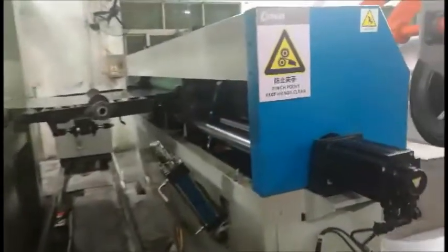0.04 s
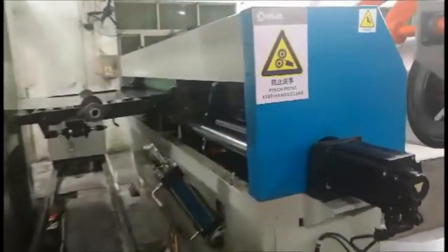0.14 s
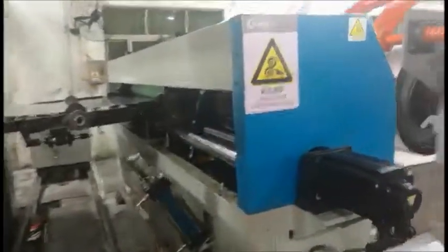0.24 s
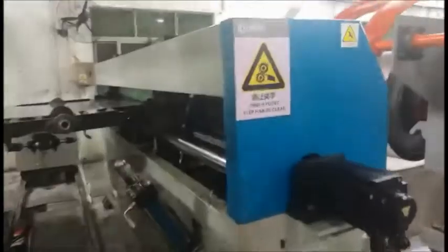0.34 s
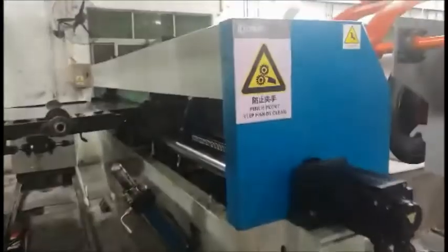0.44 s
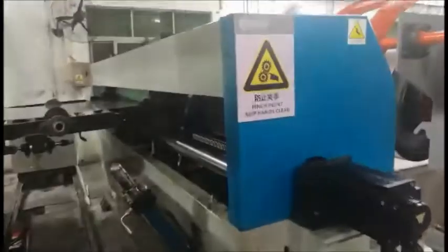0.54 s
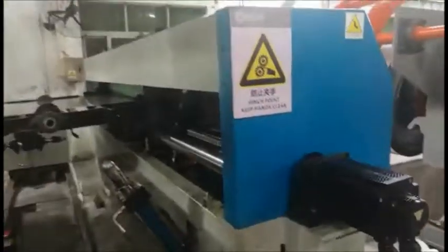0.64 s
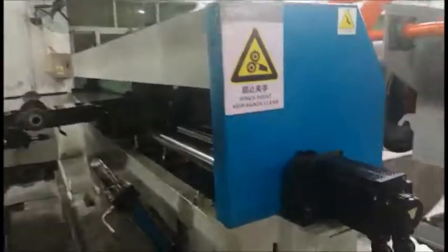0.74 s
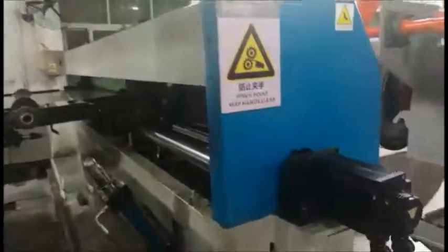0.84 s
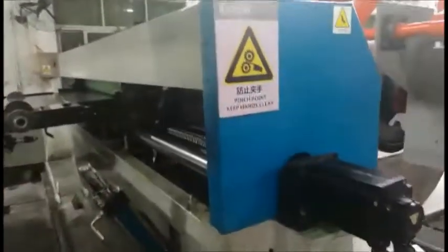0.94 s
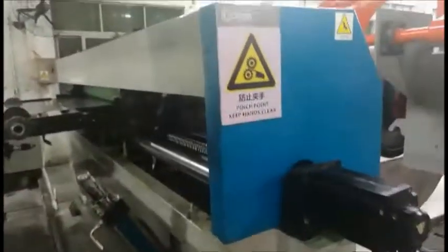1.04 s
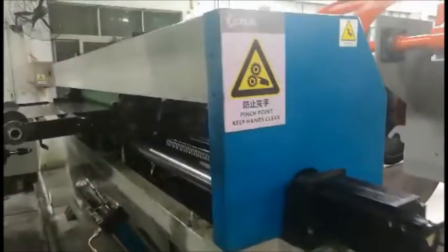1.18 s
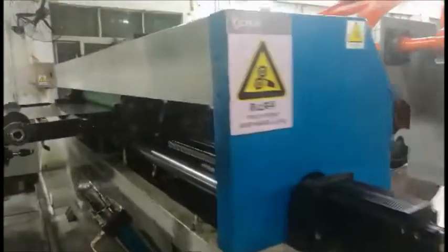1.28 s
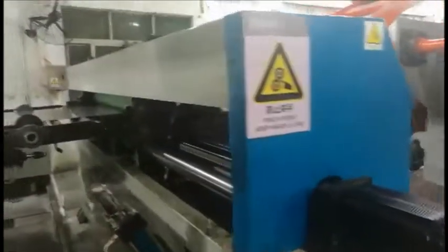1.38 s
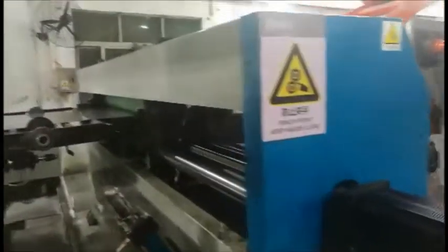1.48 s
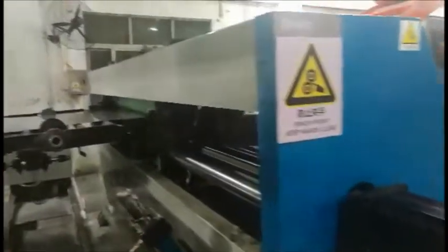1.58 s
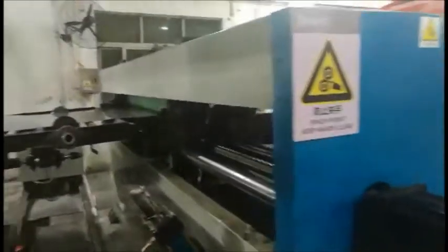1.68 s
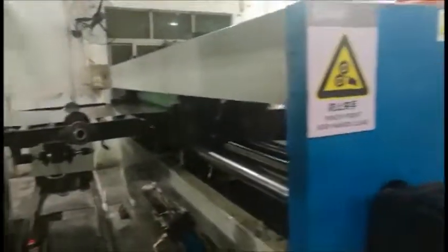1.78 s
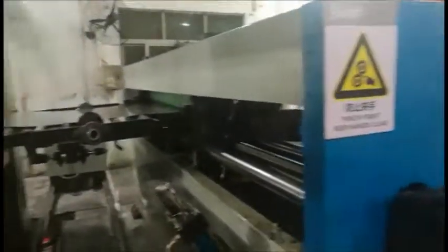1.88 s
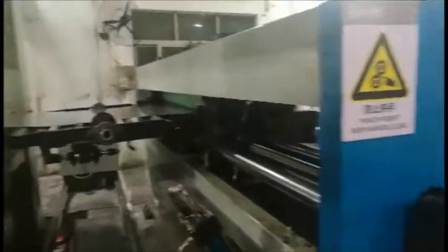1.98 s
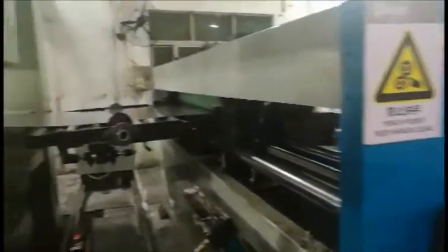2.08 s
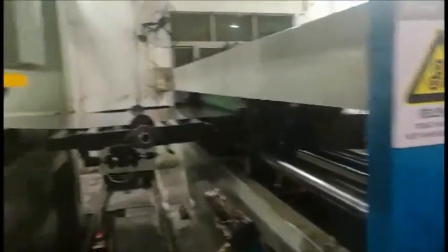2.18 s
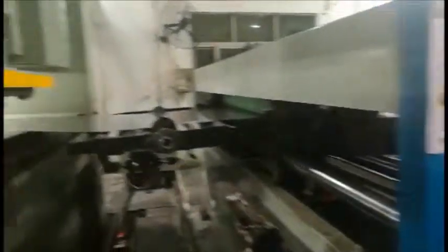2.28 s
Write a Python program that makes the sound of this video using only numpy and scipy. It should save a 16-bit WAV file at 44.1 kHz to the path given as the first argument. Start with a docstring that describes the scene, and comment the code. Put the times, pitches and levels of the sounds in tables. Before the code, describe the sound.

A power press slams sheet metal twice, each bang booming and ringing into a large hall; between them air hisses, feed rolls clunk softly and small parts click. Close stereo microphones, steady distant machine noise.

```python
"""Large factory hall, two microphones close to a power press stamping sheet metal: two strokes 1.45 s apart,
over the dying echo of an earlier one. Each is a quick run of coloured noise bursts for the die, with sines
for the booming, ringing frame, a bright sizzle and a long hall echo of decaying noise.
The strip feeder adds puffs, clunks, clicks and sliding hiss, all shaped noise; farther off, steady
shop noise and a faint sine hum. The recorder's gain control ducks after the bangs."""
import sys
import numpy as np
from scipy import signal
from scipy.fft import rfft, irfft
from scipy.io import wavfile

SR = 44100
rng = np.random.default_rng(int(sys.argv[2]) if len(sys.argv) > 2 else 0)


def generate_wav(signal):
    """Clip the signal to [-1, 1] and save it as 16-bit WAV at the path in sys.argv[1]."""
    frames = np.transpose(np.atleast_2d(signal))
    scaled = np.clip(frames, -1, 1) * 32767
    pcm = np.round(scaled).astype(np.int16)
    wavfile.write(sys.argv[1], SR, pcm)


N = 101430

# press strokes, the first before the start: t/s, level/dB, treble/dB, hall level/dB, sizzle rise/s, bass/dB
STROKES = [(-1, -1.5, 0, -3.5, .01, -1), (.237, 0, 3, 1.37, 0.0078, -0.5), (1.688, 0.5, 0, 0, 0.011, -2)]
# blows in a stroke (stripper lands, punch meets sheet, bites, snaps through, ram bottoms):
# t from the stroke/s, level/dB, rise/s, bass/dB, treble/dB
BLOWS = [(-.012, -11.5, .008, 10.5, 7), (-.001, 0.5, .002, 1, -2), (.003, -0.5, .002, -10, 2),
         (0.024, -.5, .003, 0.5, -3), (.035, -1, 0.0039, -1, -3)]
# left-right likeness of the hall sound: f/Hz, correlation (-1 to 1)
HALL_LIKENESS = [(60, 1), (200, 1), (380, 0.48), (690, -0.44), (1300, 0.21), (2400, -0.19), (5000, 0.0074)]
# left-right balance of the hall sound: f/Hz, left over right/dB
HALL_BALANCE = [(200, 0), (600, -1), (1000, 0), (2000, 3), (4000, 0), (8000, 0), (13000, -2.5)]


def amp(db):
    """Decibels to gain."""
    return 10 ** (np.asarray(db) / 20)


def read(points, hz):
    """Reads a table along log frequency."""
    f, value = np.transpose(points)
    return np.interp(np.log(hz + 1), np.log(f), value)  # + 1 keeps 0 Hz finite


def pan(db):
    """Left and right gains for a level difference, left over right."""
    left_db = np.atleast_1d(db) / 2
    return amp(np.array([left_db, -left_db]))


def add(mix, s, sound):
    """Mixes a sound in at a time, which may be negative."""
    at = round(s * SR)
    sound, part = sound[:, max(-at, 0):], mix[:, max(at, 0):]
    n = min(sound.shape[1], part.shape[1])
    part[:, :n] += sound[:, :n]


def envelope(rise_s, t60_s):
    """A straight rise, then an exponential decay by 60 dB per t60."""
    t = np.arange(N) / SR
    rise = np.minimum(t / rise_s, 1)
    return rise * amp(-60 * np.maximum(t - rise_s, 0) / t60_s)


def noise(spectrum, likeness=None, balance=None):
    """Stereo noise of unit RMS with a colour, a left-right likeness and a balance."""
    hz = np.fft.rfftfreq(N, 1 / SR)
    a, b = np.exp(2j * np.pi * rng.random((2, len(hz))))
    c = np.clip(read(likeness, hz), -1, 1) if likeness else 0
    mid, side = a * np.sqrt(1 + c), b * np.sqrt(1 - c)
    side_gains = pan(read(balance, hz) if balance else 0)
    x = irfft(np.array([mid + side, mid - side]) * amp(read(spectrum, hz)) * side_gains, N)
    return x / np.sqrt(np.mean(x ** 2))


def dying(x, t60s, size=512):
    """Lets every frequency die away at its own speed."""
    hz, t, z = signal.stft(x, SR, nperseg=size)
    decay = amp(-60 * t / read(t60s, hz)[:, None])
    return signal.istft(z * decay, SR, nperseg=size)[1][:, :N]


def toned(x, bass_db, treble_db):
    """Lifts or lowers bass and treble around the middle."""
    bass_hz, middle_hz, treble_hz = 200, 1100, 3480
    hz = np.fft.rfftfreq(2 * N, 1 / SR)
    db = read([(bass_hz, bass_db), (middle_hz, 0), (treble_hz, treble_db)], hz)
    return irfft(rfft(x, 2 * N) * amp(db))[:, :N]


def press():
    """Every stroke repeats the same crash and ring, with its own tone, sizzle and hall echo."""
    out, die = np.zeros((2, N)), crash()
    lead_in_s = -BLOWS[0][0]  # the first blow lands this long before the stroke time
    add(die, lead_in_s, frame())
    for s, db, treble_db, hall_db, sizzle_rise_s, bass_db in STROKES:
        add(out, s - lead_in_s, amp(db) * toned(die, bass_db, treble_db))
        add(out, s, amp(db) * sizzle(sizzle_rise_s))
        add(out, s, amp(hall_db) * hall_echo())
    return out


def crash():
    """The blows of one stroke, each setting off dense, short ringing in die and sheet."""
    # colour of the die: f/Hz, level per Hz/dB
    crash_colour = [(25, -38), (50, -17), (100, 11), (170, 4), (250, -6), (330, 12), (450, -9), (650, -2),
                    (1000, 6), (1500, -1.5), (2200, -3.5), (3200, -9.5), (5500, -12), (7000, -40),
                    (15000, -14)]
    # ringing time: f/Hz, t60/s
    crash_t60 = [(60, 0.13), (300, 0.49), (900, 0.4), (2000, 0.32), (5000, 0.13), (12000, .4)]
    # stereo likeness: f/Hz, correlation (-1 to 1)
    crash_likeness = [(60, .99), (150, 0.39), (300, 0.55), (600, -0.1), (1000, -0.67), (1500, 0.26),
                      (14000, 0.14)]
    # stereo balance: f/Hz, left over right/dB
    crash_balance = [(150, -1), (330, -3), (600, -8), (950, 4.5), (1500, 1), (4500, 0.5), (8000, 11.5)]
    crash_db = -15
    out = np.zeros((2, N))
    for s, db, rise_s, bass_db, treble_db in BLOWS:
        struck = toned(noise(crash_colour, crash_likeness, crash_balance), bass_db, treble_db)
        ringing = dying(struck, crash_t60)
        add(out, s - BLOWS[0][0], amp(db) * ringing * envelope(rise_s, np.inf))
    return amp(crash_db) * out


def frame():
    """The frame's modes swell as the load builds and ring on; the low boom comes late, close pairs beat."""
    # modes of frame and die: f/Hz, level/dB, t60/s, left over right/dB, left phase lead/rad,
    # beat rate of a close pair/Hz (applied only above 1)
    modes = [(54.3, -23, 0.41, 0, -0.15, 0.19), (93, -43, 2.1, -7, 1, 0.5),
             (130.5, -18.5, 0.29, -5, -0.2, 0), (154.9, -22, 2.65, 1, 0.006, 4.5),
             (174.6, -13.5, 0.17, 4, 0.28, -0.5), (181.9, -21.5, 1.68, -2, -0.4, 0.5),
             (252, -23.5, 1.96, 2, 0.59, 0), (316.3, -21, 1.84, -2.5, -0.16, -1),
             (369.5, -25, 1.9, 12, 0.99, -1), (393, -30, 1.4, -5, 1, 1.5),
             (495, -21.5, 0.87, -1.5, -2.7, -1), (562, -34.5, 1.8, 2, -0.36, 2),
             (726, -24, .5, -10, -2, -1), (818, -22, 0.32, 1, -0.88, -0.5),
             (973, -25.5, 0.66, -11, -0.35, 0.5), (1319, -31, 0.93, 4, -1.9, -0.5),
             (1377, -33, 0.79, 6, 1, -0.5), (1582, -32.5, .5, 8, 0.87, -1.5)]
    mode_rise_s = 0.024
    boom_below_hz, boom_rise_s, boom_delay_s = 110, 0.022, 0.016
    t, out = np.arange(N) / SR, np.zeros((2, N))
    for hz, db, t60, side_db, lead, beat in modes:
        delay_s, rise_s = (boom_delay_s, boom_rise_s) if hz < boom_below_hz else (0, mode_rise_s)
        phase = 2 * np.pi * (hz * t + rng.random()) + np.array([[lead], [0]])
        throb = np.sin(np.pi * beat * t) if beat > 1 else 1
        add(out, delay_s, amp(db) * pan(side_db) * envelope(rise_s, t60) * throb * np.sin(phase))
    return out


def sizzle(rise_s):
    """Bright noise that rises with the stroke and decays."""
    # f/Hz, level per Hz/dB
    sizzle_colour = [(1500, 15), (4000, 7.5), (5600, 1.5), (6800, -1), (8500, 3.5), (10000, 1), (12000, 2),
                     (14500, -14.5)]
    sizzle_db, t60_s = -19.5, 0.65
    return amp(sizzle_db) * noise(sizzle_colour, balance=HALL_BALANCE) * envelope(rise_s, t60_s)


def hall_echo():
    """The hall answers with diffuse noise, each frequency dying at its own speed."""
    # colour of the echo: f/Hz, level per Hz/dB
    hall_colour = [(25, -28), (50, -3.5), (115, -6), (170, -1.5), (220, 1), (330, 1.5), (450, -4.5),
                   (850, -3.5), (1500, -11), (2300, -13), (3300, -17.5), (5500, -18.5), (7000, -26.5),
                   (14000, -29.5)]
    # echo time: f/Hz, t60/s
    hall_t60 = [(55, 1.4), (200, 2.63), (800, 2.81), (2000, 2.36), (5000, 1.88), (12000, 2.35)]
    echo_db, rise_s = -19, 0.042
    echo = dying(noise(hall_colour, HALL_LIKENESS, HALL_BALANCE), hall_t60)
    return amp(echo_db) * echo * envelope(rise_s, np.inf)


def feeder():
    """The strip feeder beside the press: sliding strip, air, feed rolls and small parts."""
    return strip_slide() + air_puffs() + roll_clunks() + part_clicks()


def strip_slide():
    """Hiss of the sliding strip, swelling up to each stroke time and fading after it."""
    # f/Hz, level per Hz/dB
    slide_colour = [(500, -24), (2000, -2), (5000, 2), (7500, -4.5), (13000, -1.5)]
    slide_db, slide_s = -38.5, 0.083  # time for a fall by a factor e either side
    out, t = np.zeros((2, N)), np.arange(N) / SR
    for s, *_ in STROKES:
        out += amp(slide_db) * noise(slide_colour) * np.exp(-abs(t - s) / slide_s)
    return out


def air_puffs():
    """Short puffs of air: hissing noise with a quick rise and a decay."""
    # t/s, level/dB, rise/s, t60/s, left over right/dB
    puffs = [(.412, -25, .014, 0.31, 2), (.646, -23.5, 0.0048, 0.31, 1), (.805, -39, 0.024, 0.53, 2),
             (1.556, -32, .012, 0.41, 0), (1.845, -29, 0.034, 0.47, 0.5), (2.28, -31.5, 0.015, 0.43, 3)]
    # f/Hz, level per Hz/dB
    puff_colour = [(800, -30), (2000, -2), (3500, 1.5), (5600, 4), (7000, -2.5), (8700, 0.5), (11000, 2),
                   (13500, 2), (15000, 3.5)]
    out = np.zeros((2, N))
    for s, db, rise_s, t60, side_db in puffs:
        hiss = noise(puff_colour, balance=HALL_BALANCE)
        add(out, s, amp(db) * pan(side_db) * hiss * envelope(rise_s, t60))
    return out


def roll_clunks():
    """Dull clunks of the feed rolls, noise with a long hall-like tail."""
    # t/s, level/dB
    clunks = [(.62, -31), (.79, -34.5)]
    # f/Hz, level per Hz/dB
    clunk_colour = [(60, -29), (150, 1), (330, -0.5), (700, -1), (1500, -5), (2400, -9.5), (4000, -17),
                    (8000, -26.5)]
    rise_s, t60_s = 0.013, 1.8
    out = np.zeros((2, N))
    for s, db in clunks:
        clunk = noise(clunk_colour, HALL_LIKENESS, HALL_BALANCE)
        add(out, s, amp(db) * clunk * envelope(rise_s, t60_s))
    return out


def part_clicks():
    """Clicks of feed parts and strip: a band of noise with a sharp rise and its own decay."""
    # t/s, level/dB, centre f/Hz, t60/s, left over right/dB
    clicks = [(.02, -48.5, 4300, .12, -3), (.06, -48, 4000, .1, 0), (0.175, -35.5, 2680, 0.034, 8.5),
              (0.645, -41, 5600, 0.12, 5), (0.652, -38.5, 1890, 0.79, 6), (0.829, -39, 3320, .18, 3),
              (1.11, -40, 1500, 0.31, 4), (1.632, -41, 3800, 0.098, 1), (2.047, -38, 13000, .04, 3),
              (2.272, -36.5, 2570, 0.4, -3)]
    step_octaves, rise_s = 0.54, 0.0018
    out = np.zeros((2, N))
    for s, db, hz, t60, side_db in clicks:
        # bell-shaped band: 5 dB down one step from the centre, 20 dB at two
        band = [(hz * 2 ** (k * step_octaves), -5 * k * k) for k in range(-4, 5)]
        add(out, s, amp(db) * pan(side_db) * noise(band) * envelope(rise_s, t60))
    return out


def shop():
    """Distant machines as steady noise, and a faint motor hum of sines."""
    # machine noise: f/Hz, level per Hz/dB
    shop_colour = [(25, -10), (50, -10.5), (85, 0.5), (120, -1.5), (160, -9.5), (300, 4), (480, -5),
                   (800, -1.5), (1300, -6.5), (2200, -8), (4000, -12), (7000, -19), (10000, -19.5),
                   (14000, -19.5)]
    # motor hum: f/Hz, level/dB
    hum_tones = [(84, -65.5), (265, -48), (775, -54.5)]
    shop_db = -39
    t = np.arange(N) / SR
    hum = sum(amp(db) * np.sin(2 * np.pi * (hz * t + rng.random())) for hz, db in hum_tones)
    return amp(shop_db) * noise(shop_colour, HALL_LIKENESS, HALL_BALANCE) + hum


def panel_ripple(x):
    """Many narrow resonances among the steel panels, a different set for each side."""
    rms_db, width_hz, full_above_hz = 2.5, 65, 1260
    hz, grid = np.fft.rfftfreq(N, 1 / SR), np.arange(1000)
    heights_db = rng.uniform(-1, 1, (2, len(grid))) * np.sqrt(3) * rms_db
    db = np.array([np.interp(hz / width_hz, grid, row) for row in heights_db])
    gain = amp(db * np.minimum(hz / full_above_hz, 1) ** 2)
    # minimum phase, so the panels ring only after the sound
    log_gain = np.log(np.concatenate([gain, gain[:, -2:0:-1]], axis=1))
    causal = np.exp(np.conj(signal.hilbert(log_gain)))[:, :len(hz)]
    return signal.fftconvolve(x, irfft(causal)[:, :4096], axes=1)[:, :N]


def scene():
    """Press, feeder and shop among the steel panels; two close microphones hear the bass alike."""
    left, right = panel_ripple(press() + feeder() + shop())
    full_width_hz = 170  # the side signal narrows below this
    hz = np.fft.rfftfreq(N, 1 / SR)
    mid = (left + right) / 2
    side = irfft(rfft(left - right) / 2 * np.minimum(hz / full_width_hz, 1), N)
    return np.array([mid + side, mid - side])


def record(dry):
    """Gain control ducks after each bang and recovers; soft overload on the peaks, then the band limit."""
    knee_db, squeeze, sense_s = -22.5, 0.25, 0.046  # squeeze: dB of ducking per dB over the knee
    sensed_fall_db_per_s, edge_hz = 16, 14150
    r = np.exp(-1 / (sense_s * SR))
    power = signal.lfilter([1 - r], [1, -r], (dry ** 2).mean(0))
    power_db = 10 * np.log10(power + 1e-12)
    # the sensed level jumps up with the sound but falls no faster than a straight line
    fall = np.arange(N) / SR * sensed_fall_db_per_s
    sensed_db = np.maximum.accumulate(power_db + fall) - fall
    ducked = dry * amp(-squeeze * np.maximum(sensed_db - knee_db, 0))
    held = ducked / (1 + ducked ** 6) ** (1 / 6)  # soft ceiling at full scale
    band_limit = signal.firwin(401, edge_hz, window=("kaiser", 9), fs=SR)
    return signal.oaconvolve(held, band_limit[None], "same")


dry = scene()
out = record(dry)
generate_wav(out)
```